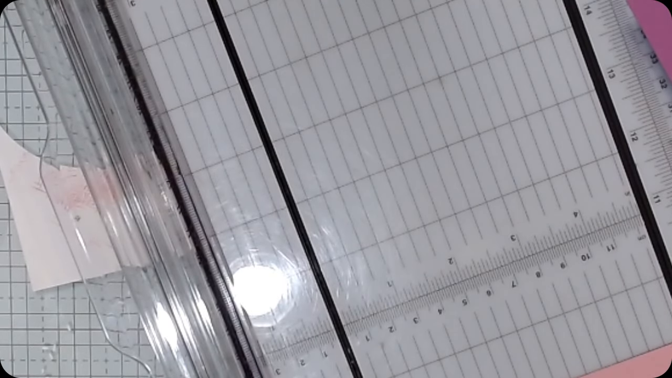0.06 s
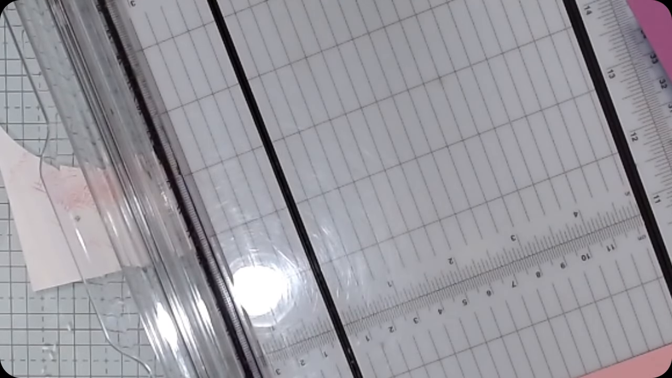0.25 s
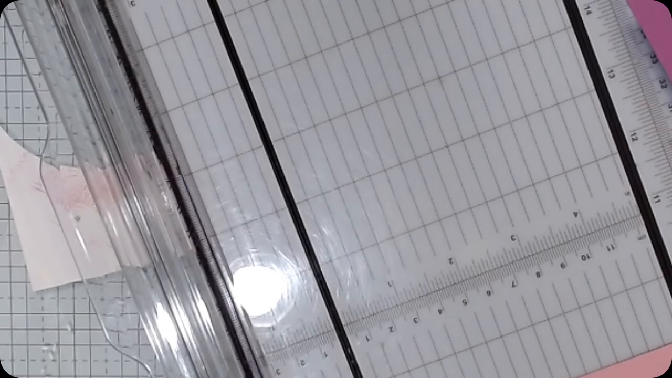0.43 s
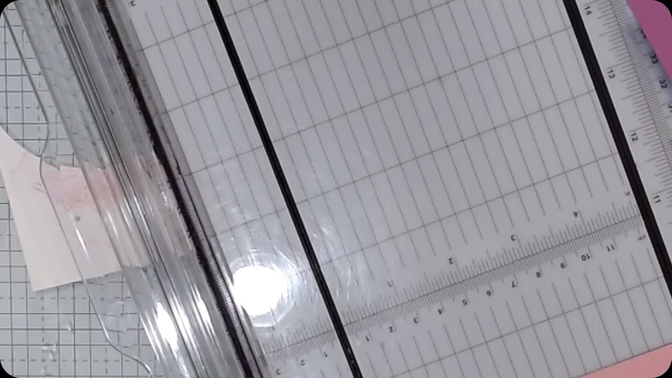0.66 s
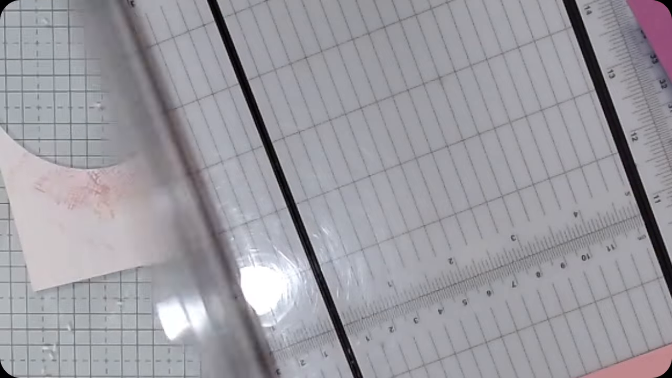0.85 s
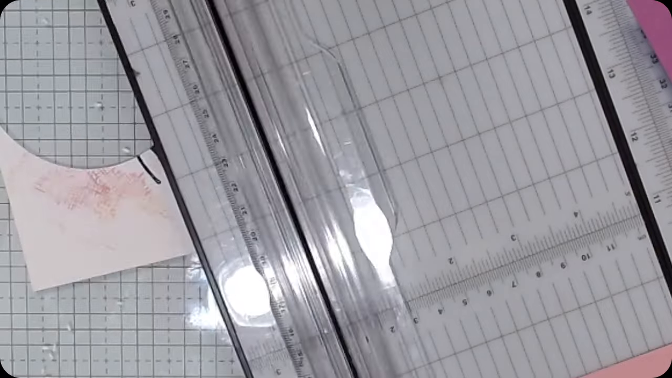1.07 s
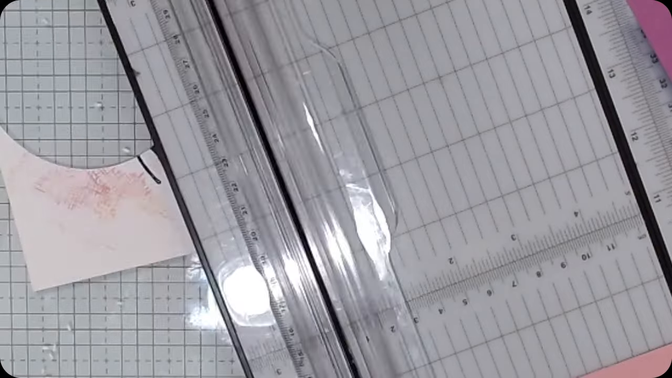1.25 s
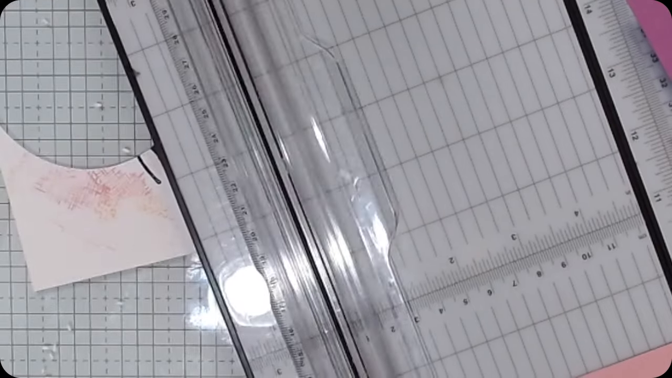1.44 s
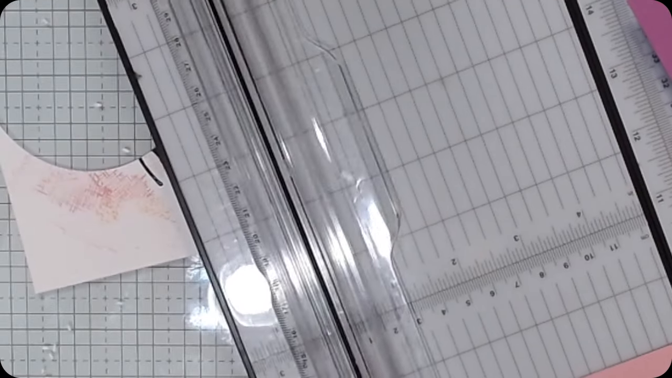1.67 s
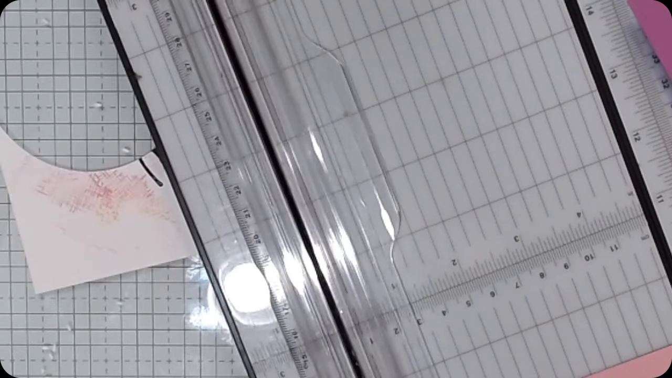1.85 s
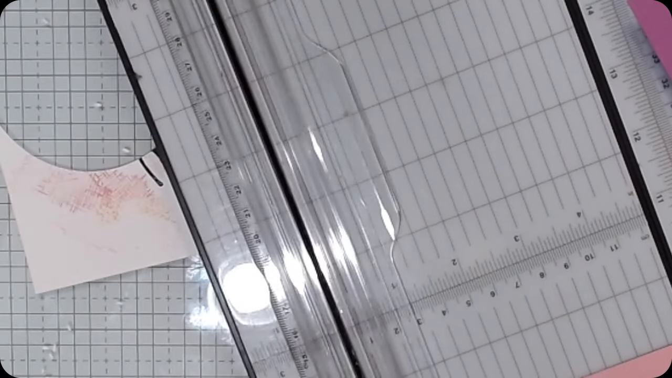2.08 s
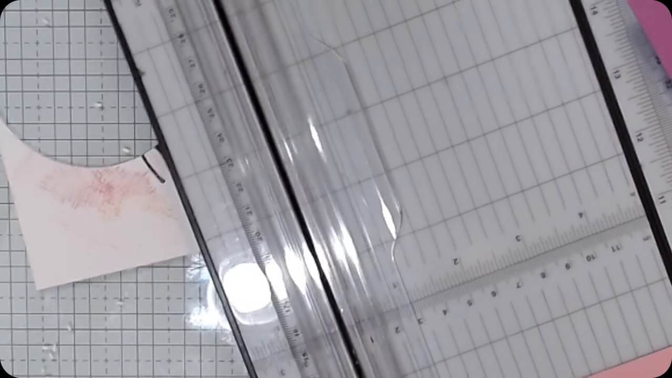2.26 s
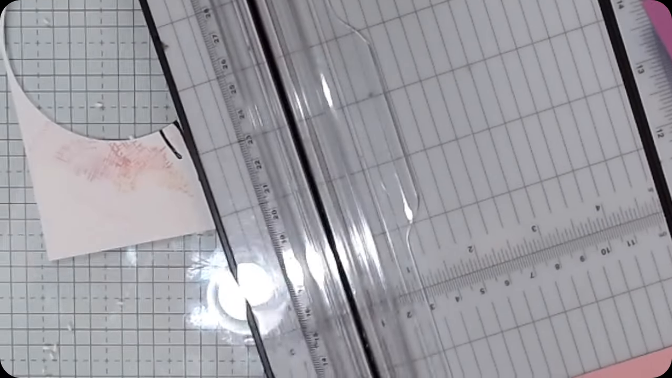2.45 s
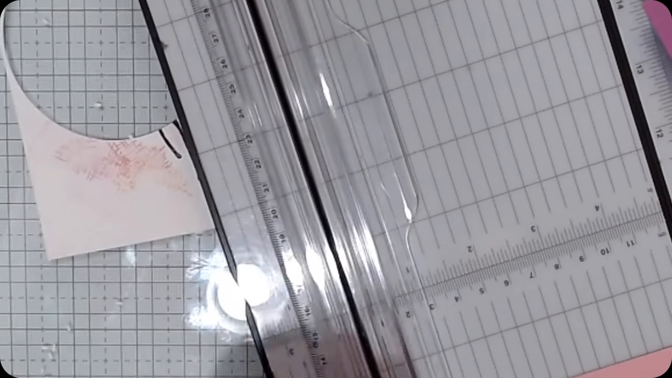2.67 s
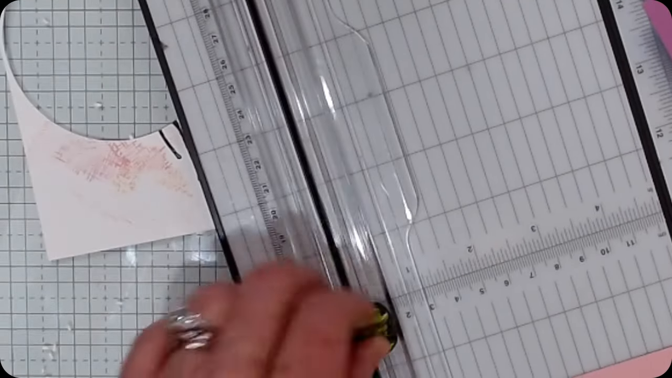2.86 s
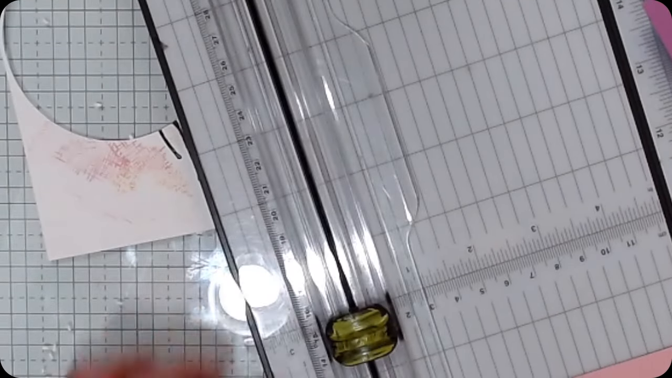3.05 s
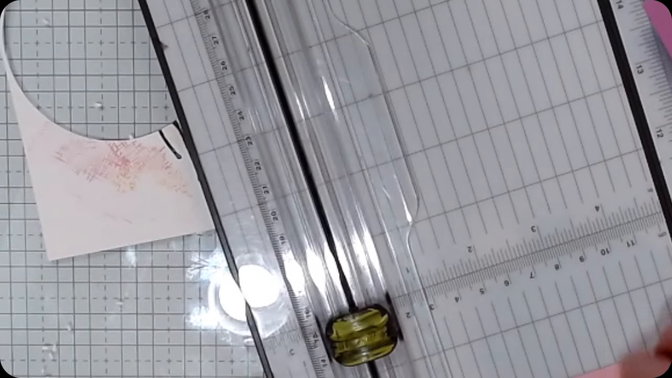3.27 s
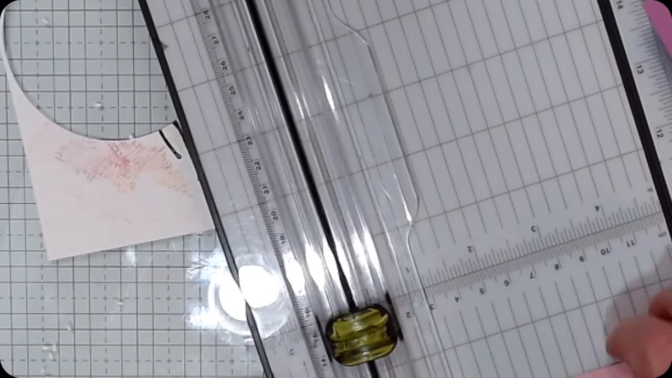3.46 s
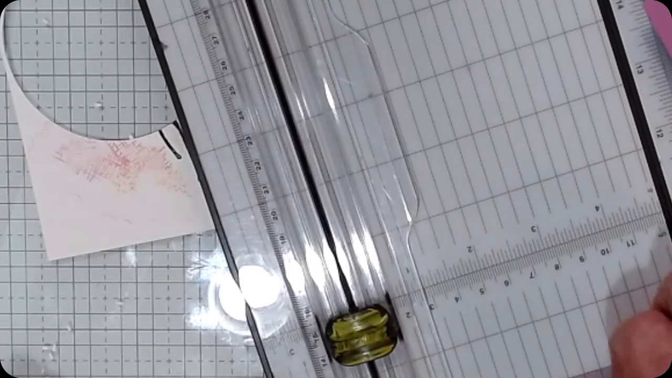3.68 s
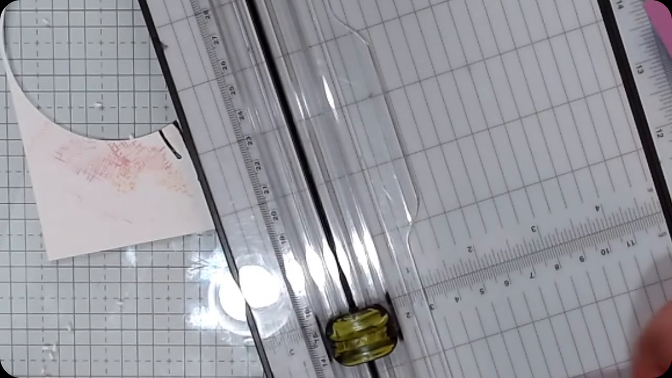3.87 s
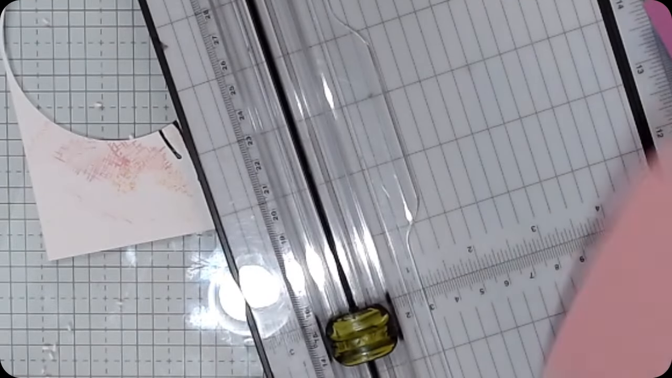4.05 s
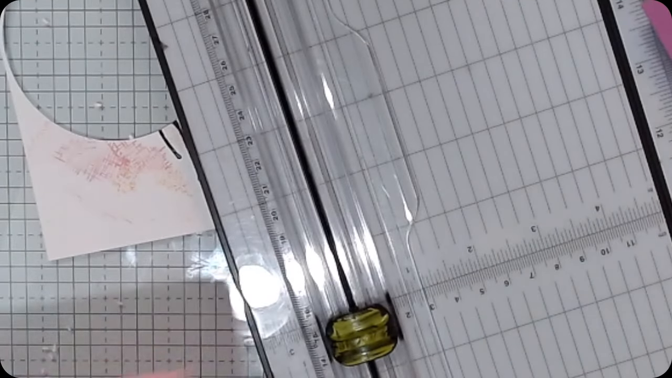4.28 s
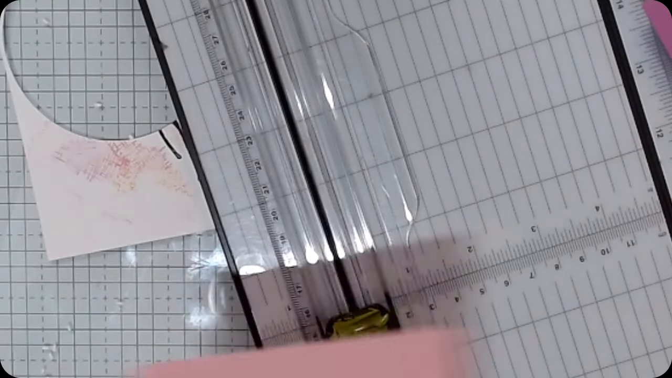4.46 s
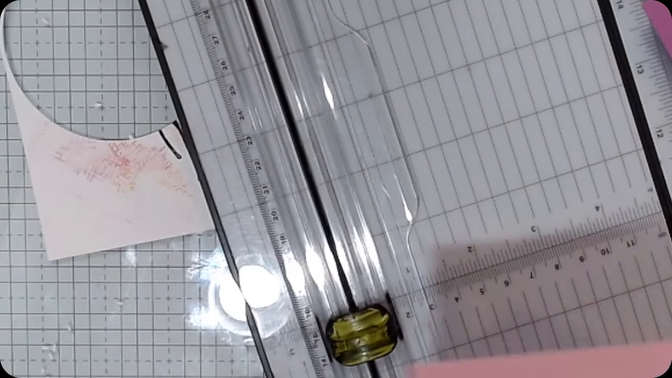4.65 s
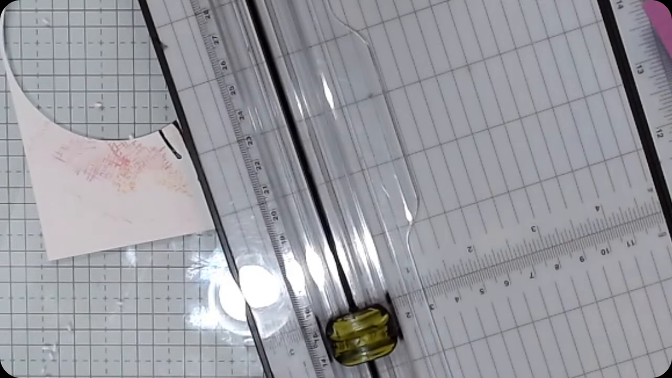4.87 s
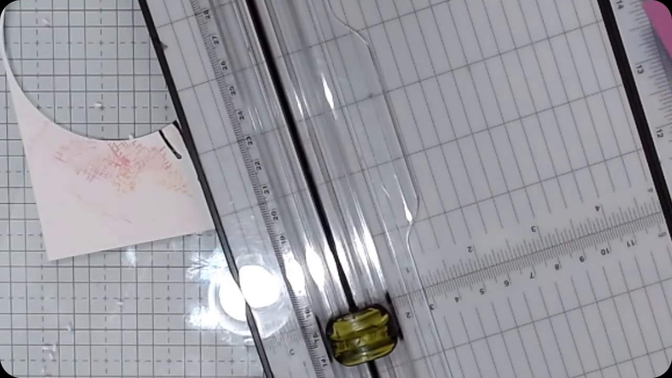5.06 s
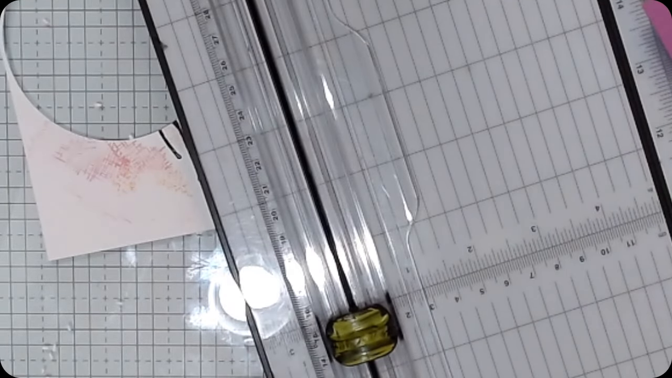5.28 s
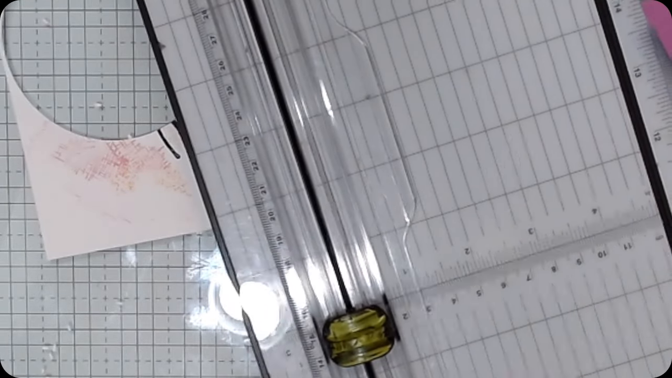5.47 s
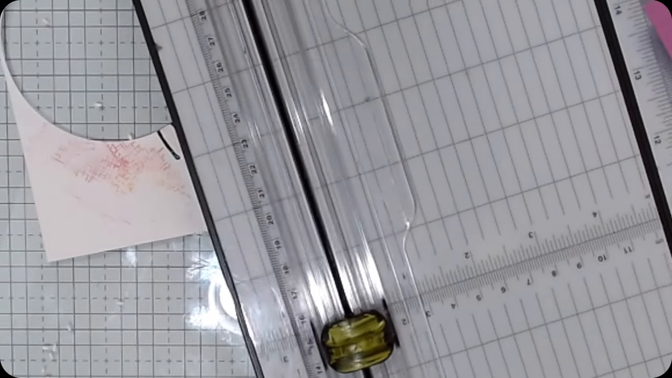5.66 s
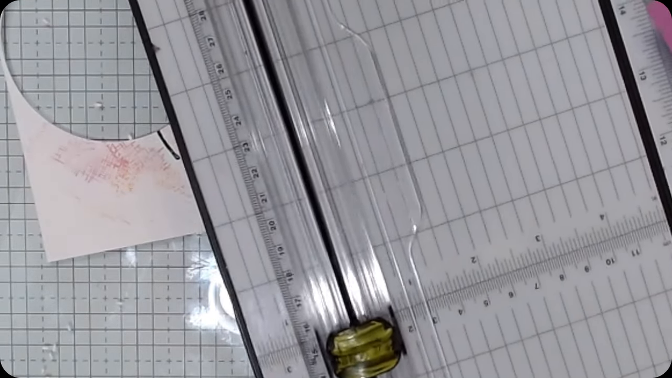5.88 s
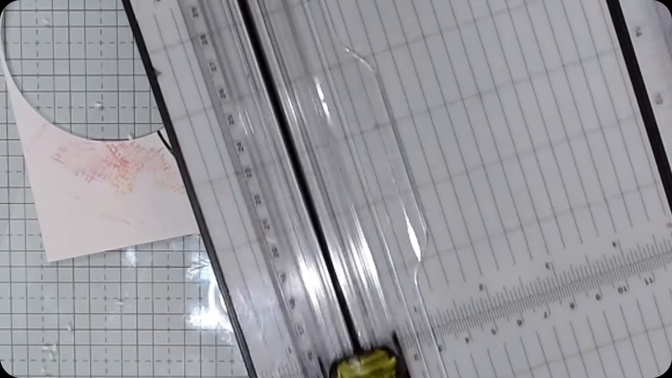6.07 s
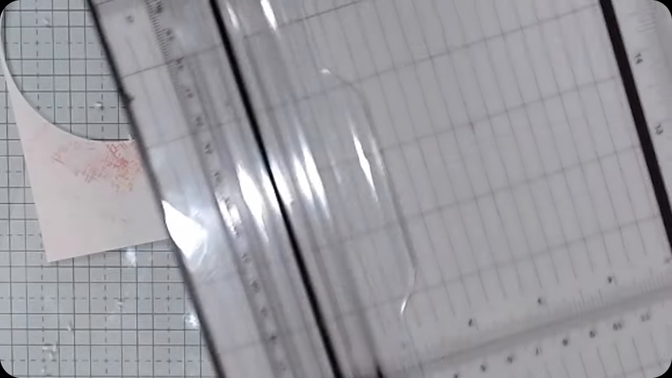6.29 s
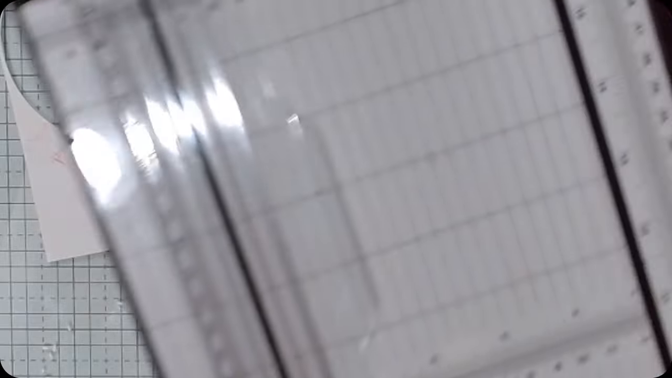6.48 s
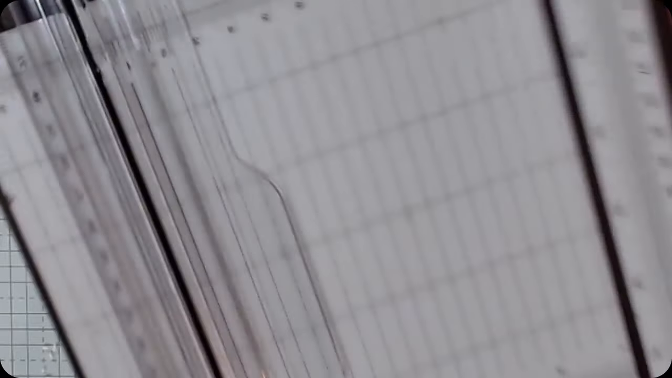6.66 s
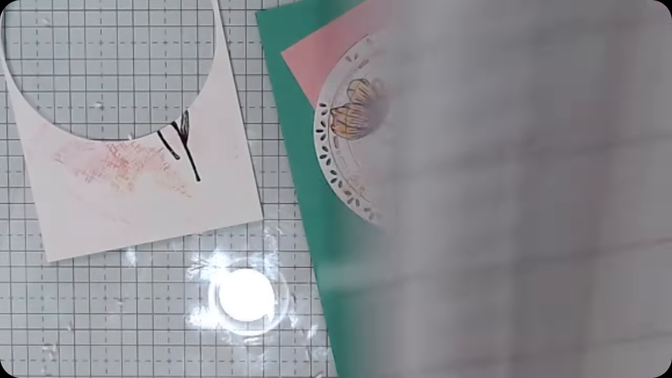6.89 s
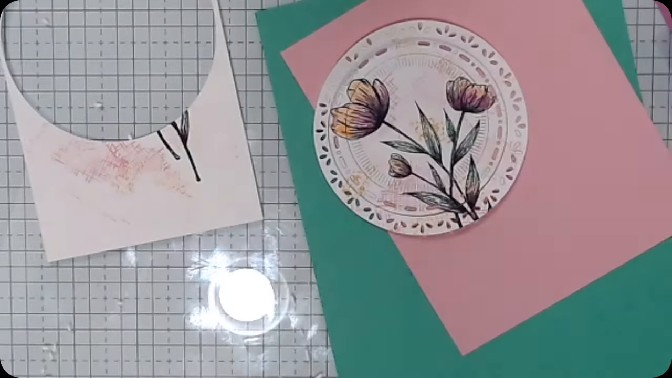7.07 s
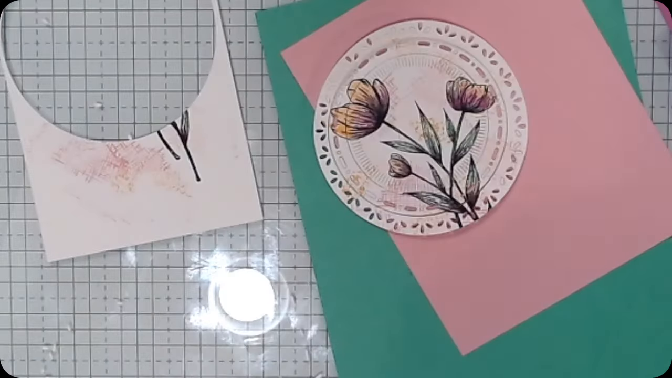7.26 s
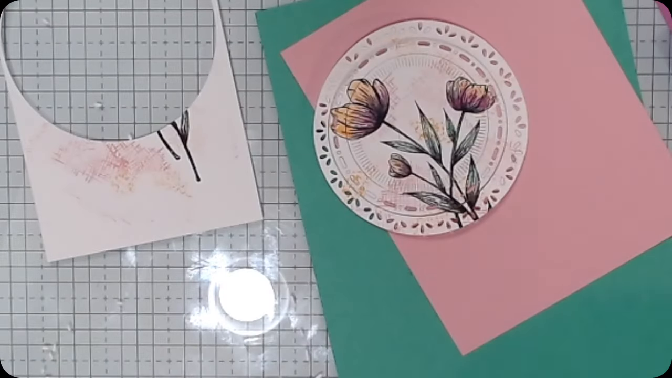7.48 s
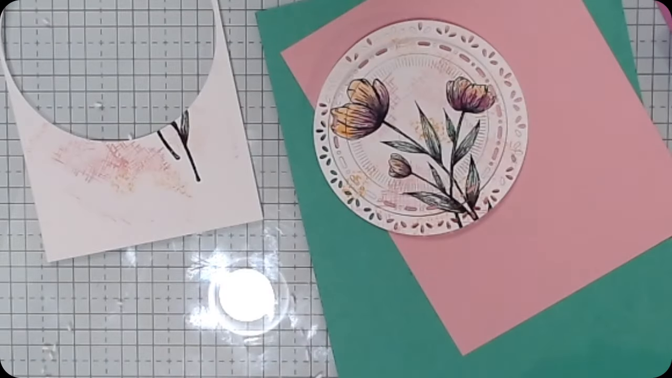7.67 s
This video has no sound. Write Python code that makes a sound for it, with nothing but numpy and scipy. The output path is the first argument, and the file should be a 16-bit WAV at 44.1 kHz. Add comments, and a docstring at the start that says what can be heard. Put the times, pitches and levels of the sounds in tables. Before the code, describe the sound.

A small quiet room with low soft noise and faint mains hum, heard close in slightly dull stereo. Almost nothing until a small plastic knock at 0.8 s. At 1.13 s the trimmer's arm claps over, hollow and bright, with a short rattle. From 1.7 s a tight cluster of clicks builds to the loudest, sharpest snap at 1.81 s, ringing and buzzing briefly. Light knocks at 2.0-2.3 s lead into a dry, gritty blade rasp, 2.33-2.77 s, its resonances climbing, halted by a firm clack; ticks follow at 2.9-3.0 s. From 3.3 to 4.0 s card flicks, taps and short papery glides mix with dull table thuds, then thin out. Small ticks come at 5.3-5.8 s, a scuff at 5.92, a short scrape at 6.45 with very faint wavering squeaks, and a soft card landing at 6.83. Quiet rustle fades to room tone.

```python
"""Plastic paper trimmer on a craft table, close to two microphones in a small room.
Arm, latch and carriage knock as decaying noise bursts through tray modes, and longer modes ring on.
The blade rasps through cardstock to its stop: random slips drive rail resonances that climb.
The card taps, glides and lands, the base scuffs and scrapes free, the loose arm rattles, thin squeaks bend.
Table thuds and rumble lie below; echoes, room noise and mains hum surround it all."""
import sys
import numpy as np
from scipy import signal
from scipy.fft import rfft, irfft
from scipy.io import wavfile

SR = 44100
rng = np.random.default_rng(int(sys.argv[2]) if len(sys.argv) > 2 else 0)


def transcribe(u):
    """Save the signal u as a 16-bit wav file named by the first command-line argument.

    u: samples, shape (n,) or (channels, n), limited to [-1, 1]; the rate is SR.
    q: integer samples, one column per channel.
    """
    v = np.clip(np.atleast_2d(u).T, -1, 1)
    q = np.round(v * 32767).astype(np.int16)
    wavfile.write(sys.argv[1], SR, q)


N = 340893
TIME = np.arange(N) / SR


def undb(db):
    """Decibels to gain."""
    return 10 ** (np.asarray(db) / 20)


def unit(x):
    """Scale to rms 1."""
    return x / np.sqrt(np.mean(x ** 2))


def band(x, lo_hz, hi_hz, order=3):
    """Butterworth band-pass."""
    return signal.sosfilt(signal.butter(order, [lo_hz, hi_hz], "band", fs=SR, output="sos"), x + 1e-18)


def colour(x, points, power=1, size=4096):
    """Minimum-phase filter through (frequency [Hz], gain [dB]) points; power scales the dB."""
    hz, db = np.transpose(points)
    bins_hz = np.maximum(np.arange(size // 2 + 1), .5) * SR / size
    gain_db = np.interp(np.log(bins_hz), np.log(hz), db)
    cepstrum = irfft(power * np.log(undb(gain_db)))
    # fold the cepstrum to make the filter causal
    cepstrum[1:size // 2] *= 2
    cepstrum[size // 2 + 1:] = 0
    response = irfft(np.exp(rfft(cepstrum)))
    return signal.fftconvolve(x, response)[:len(x)]


def resonate(x, peaks):
    """Parallel resonances (frequency [Hz], width [Hz], gain [dB])."""
    out = 0
    for hz, width_hz, db in peaks:
        b, a = signal.iirpeak(hz, hz / width_hz, fs=SR)
        out = out + undb(db) * signal.lfilter(b, a, x + 1e-18)
    return out


def fade(t, t60_s):
    """Exponential decay, 60 dB in t60_s."""
    return np.exp(-np.log(1000) * t / t60_s)


def ramp(start_s, length_s):
    """Rise from 0 to 1; with a negative length, a fall that ends at start_s."""
    return np.clip((TIME - start_s) / length_s, 0, 1)


def stroke(start_s, length_s):
    """Loudness of one hand stroke: speeds up and slows down as a half sine."""
    return np.sin(np.pi * ramp(start_s, length_s))


def strokes(rows):
    """Body and hiss gains of strokes (start [s], length [s], body level [dB], hiss level [dB])."""
    return sum(np.outer(undb([body_db, hiss_db]), stroke(start_s, length_s))
               for start_s, length_s, body_db, hiss_db in rows)


def grains(rate_hz, spread_db):
    """Tiny slips and snapping fibres: random clicks of uneven size and either sign."""
    size = undb(spread_db * np.minimum(rng.exponential(size=N), 4))
    fires = rng.random(N) < rate_hz / SR
    return unit(fires * size * rng.choice([-1, 1], N))


# treble of a blow: (frequency [Hz], gain [dB])
SNAP_COLOUR = [(2450, -0.5), (3700, 1), (5100, -1.5), (6600, -7.5), (7400, -15)]
# hard contacts snap and are over, dull ones chatter on: t60 at snap = body, its growth as snap falls
CHATTER_T60_S, CHATTER_S_PER_DB, SHORTEST_T60_S = .04, .0025, .026


def blows(table, peaks, plain_db, tick_db, spot_db, thump_hz, body_hz):
    """Each blow is a sharp tick and a short noise chatter, split into thump, body and snap."""
    out = np.zeros(N + SR)
    t = np.arange(SR // 5) / SR
    for time_s, level_db, thump_db, snap_db, spot_hz in table:
        t60_s = max(CHATTER_T60_S - CHATTER_S_PER_DB * snap_db, SHORTEST_T60_S)
        shock = rng.standard_normal(len(t)) * fade(t, t60_s)
        shock[0] += undb(tick_db)
        shock = undb(plain_db) * shock + resonate(shock, peaks)
        shock = shock + resonate(shock, [(spot_hz, spot_hz / 6, spot_db)])
        thump = unit(band(shock, thump_hz, 400, order=2))
        body = unit(band(shock, body_hz, 2140))
        snap = unit(colour(band(shock, 2350, 12000), SNAP_COLOUR))
        hit = undb(thump_db) * thump + body + undb(snap_db) * snap
        start = int(time_s * SR)
        # body level = its energy packed into 10 ms; unit() spread it over 200 ms
        out[start:start + len(t)] += undb(level_db) * hit / np.sqrt(20)
    return out[:N]


# blows on the trimmer, level before the trim in trimmer():
# (time [s], level [dB], thump re level [dB], snap re level [dB], struck-spot resonance [Hz])
KNOCKS = [(0.791, -40.5, -17, -8, 1580), (1.03, -46, -12, -20, 1520), (1.101, -41, 0, -10.5, 600),
          (1.1324, -22, -10, -15, 850), (1.139, -23, -9.5, -3, 3420), (1.151, -37, -8, -6, 800),
          (1.244, -48, -10, -22, 1000), (1.3725, -42.5, -3, -10.5, 910), (1.389, -43, -16.5, -18, 810),
          (1.7055, -50, -13, 0, 1900), (1.709, -36, -13, -16, 1350), (1.737, -45, -12, -12.5, 710),
          (1.7772, -23, -13, -8.5, 1420), (1.792, -23.5, -13, -12, 1720), (1.808, -28, -21, 3, 2610),
          (1.8112, -16, -17.5, 1, 5000), (1.8206, -23.5, -12.5, -16, 1530), (1.863, -35.5, -22, -5, 630),
          (2.0146, -40.5, -5, -10.5, 800), (2.035, -44, -29, -15, 920), (2.222, -39.5, -6, -11.5, 740),
          (2.27, -34, -15.5, -3, 860), (2.284, -43, 2.5, -9, 900), (2.7604, -27, -8.5, -2.5, 5230),
          (2.766, -28.5, -16, -11, 1640), (2.9219, -36, -31, 1, 4270), (3.001, -48, 6, 0, 1500),
          (3.0055, -37, -10, -9.5, 1540), (3.0105, -36.5, -19, -8, 1500), (3.17, -47.5, -3, -11.5, 775),
          (5.307, -48, -7.5, -10.5, 1385), (5.434, -45.5, -9, 1.5, 2800), (5.514, -50.5, -11.5, -7, 2850),
          (5.546, -51, -13, -17, 800), (5.636, -53.5, -17.5, -.5, 1980), (5.7456, -36, -13.5, -10, 800),
          (5.789, -52.5, -14.5, -16, 836), (5.951, -48, -20, -8, 1230), (6.451, -43.5, -12.5, -10, 780),
          (6.47, -43.5, -10, -6.5, 2070), (7.585, -58, -10.5, -22, 950)]
# broad resonances of tray and arm: (frequency [Hz], width [Hz], gain [dB])
TRAY_MODES = [(175, 70, 0.5), (400, 110, -1), (587.5, 100, 5), (780, 120, 5), (995, 110, -4),
              (1306, 200, -5), (1954, 630, -6.5), (2460, 260, -5), (2850, 450, -5.5), (3410, 140, 4.5),
              (3990, 130, -4.5), (5490, 200, -8.5)]
# long rings of the plastic, gain before the trim in trimmer(): (frequency [Hz], gain [dB], t60 [s])
PLASTIC_RINGS = [(182, -9, 0.38), (604, -6.5, 0.093), (697, 3.5, 0.074), (867, 1, 0.62),
                 (1034, -15.5, 0.48), (1283, 3, 0.33), (1400, -3.5, 0.59), (1782, -17.5, 1.3),
                 (2186, -17, 0.35), (2430, -17, 0.37), (2810, 3, 0.19), (3260, -21.5, 0.35),
                 (3499, -22.5, 0.29), (3747, -23.5, 0.43), (4100, -9.5, 0.22), (4210, -17.5, 0.23),
                 (4328, -19, 0.72), (4630, -9, 0.35), (4743, -20, 0.28), (4840, -22, 0.3)]


def trimmer():
    """Arm, latch and carriage knock on the tray; each blow couples differently to the ringing modes."""
    hits = blows(KNOCKS, TRAY_MODES, plain_db=0.5, tick_db=18.5, spot_db=1.5, thump_hz=95, body_hz=480)
    times_s = np.array(KNOCKS)[:, 0]
    couplings = rng.uniform(-1, 1, (len(PLASTIC_RINGS), len(KNOCKS)))
    # index of the latest blow at every sample
    latest = np.maximum(np.searchsorted(times_s - 1 / SR, TIME) - 1, 0)
    ring = np.zeros(N)
    for coupling, (hz, db, t60_s) in zip(couplings, PLASTIC_RINGS):
        width_hz = np.log(1000) / np.pi / t60_s
        ring += resonate(hits * coupling[latest], [(hz, width_hz, db)])
    return undb(-1.6) * hits + undb(0.3) * ring


# treble of rubbing: (frequency [Hz], gain [dB])
RUB_COLOUR = [(2450, 1.5), (3600, 3), (5100, 3), (6600, 0.5), (7400, -8.5)]


def rub(gains, slips, peaks, plain_db, rumble_db):
    """Friction: a stream of slips shakes the body and hisses above it."""
    body_gain, hiss_gain = gains
    shaken = undb(plain_db) * slips + resonate(slips, peaks)
    low = unit(band(shaken, 90, 400, order=2))
    body = unit(band(shaken, 350, 2254)) + undb(rumble_db) * low
    hiss = unit(colour(band(shaken, 2350, 13000), RUB_COLOUR))
    return body * body_gain + hiss * hiss_gain


# resonances of carriage and rail: (frequency [Hz], width [Hz], gain [dB])
RAIL_MODES = [(160, 32, -0.5), (598, 120, 2.5), (928, 98, -7.5), (1443, 96, -5), (2033, 30, -4),
              (2985, 90, 5.5), (3377, 260, 5), (4180, 91, 1), (5660, 200, -17)]
# rail between carriage and stop, at FASTEST_S: (frequency [Hz], width [Hz], gain [dB])
SPAN_MODES = [(1100, 91, 6.5), (1460, 100, 3.5), (3090, 160, 4.5), (4090, 170, 5.5), (5300, 220, 7)]
# carriage creeps up to the card, bites, cuts at an even push, is halted by its stop
CREEP_S, BITE_S, STOP_S = 2.25, 2.335, 2.77
BITE_ATTACK_S, STOP_RELEASE_S = .04, .015
CREEP_DB, CUT_BODY_DB, CUT_HISS_DB = -53, -37.4, -35
# hiss peaks where the carriage is fastest; sag is reached half a cut's length away
FASTEST_S, HISS_SAG_DB = 2.58, 3.5
CLIMB_PER_S = .75  # climb of the span modes, share of their frequency per second


def blade():
    """The blade tears fibres at about 1800 slips a second and shakes carriage and rail."""
    flutter_db = 1.6 * unit(band(rng.standard_normal(N), 30, 250, order=1))
    slips = grains(rate_hz=1800, spread_db=2.0) * undb(flutter_db)
    # free rail shortens ahead of the carriage: read its resonances ever faster
    from_fastest_s = np.clip(TIME, BITE_S, STOP_S) - FASTEST_S
    clock_s = np.cumsum(1 + CLIMB_PER_S * from_fastest_s) / SR
    slips = slips + np.interp(clock_s, TIME, resonate(slips, SPAN_MODES))
    cutting = ramp(BITE_S, BITE_ATTACK_S) * ramp(STOP_S, -STOP_RELEASE_S)
    creeping = stroke(CREEP_S, BITE_S + BITE_ATTACK_S - CREEP_S)
    sag_db = HISS_SAG_DB * (2 * from_fastest_s / (STOP_S - BITE_S)) ** 2
    body_gain = undb(CUT_BODY_DB) * cutting + undb(CREEP_DB) * creeping
    hiss_gain = undb(CUT_HISS_DB - sag_db) * cutting
    return rub((body_gain, hiss_gain), slips, RAIL_MODES, plain_db=-0.5, rumble_db=-11.5)


# loose arm in its hinges after each slam: (start [s], body level [dB], hiss level [dB])
RATTLES = [(1.15, -41, -44), (1.83, -40, -40.5)]
RATTLE_T60_S = .22


def rattle():
    """The arm buzzes against the tray as sparse slips that die away."""
    gains = 0
    for start_s, body_db, hiss_db in RATTLES:
        decay = (TIME > start_s) * fade(np.abs(TIME - start_s), RATTLE_T60_S)
        gains = gains + np.outer(undb([body_db, hiss_db]), decay)
    return rub(gains, grains(rate_hz=600, spread_db=2.5), TRAY_MODES, plain_db=-2, rumble_db=-10)


# sleeves and card while the hands are at work
BUSY_START_S, BUSY_END_S, BUSY_FADE_S = .75, 7.5, .2
RUSTLE_BODY_DB, RUSTLE_HISS_DB, RUSTLE_SWELL_RMS_DB = -73, -78, 3


def rustle():
    """Body and hiss gains of small restless movements: a randomly swelling level."""
    busy = ramp(BUSY_START_S, BUSY_FADE_S) * ramp(BUSY_END_S, -BUSY_FADE_S)
    swell_db = RUSTLE_SWELL_RMS_DB * unit(band(rng.standard_normal(N), 2, 30, order=2))
    return np.outer(undb([RUSTLE_BODY_DB, RUSTLE_HISS_DB]), busy * undb(swell_db))


# flicks and taps of the card:
# (time [s], level [dB], thump re level [dB], snap re level [dB], struck-spot resonance [Hz])
TAPS = [(0.429, -66, 14.5, 10.5, 4530), (3.2935, -56, 11, -.5, 586), (3.3035, -38, 4, -9, 634),
        (3.3146, -42.5, 8, -2, 650), (3.3638, -34, -9, -4.5, 1540), (3.376, -40, -27, -2, 3510),
        (3.395, -43, -12, -11, 665), (3.463, -39.5, -6, -20, 576), (3.562, -44, -3.5, -6, 2200),
        (3.575, -42, 0, -8, 584), (3.75, -47.5, -15, -.5, 2700), (3.8784, -35.5, -25, 7.5, 3150),
        (3.885, -44, -10, -3, 2540), (3.895, -36, -14, -16, 1420), (3.9123, -37.5, -6, -5, 1390),
        (3.9723, -33, -12, -3.5, 1710), (4.218, -45, -9, -5, 1180), (4.382, -48, -8, -9.5, 1530),
        (4.704, -53, -4, -6.5, 1030), (4.7335, -47.5, -9, -4.5, 1320), (4.783, -53, -4, -14.5, 1420),
        (6.839, -46, -6.5, -4.5, 1624)]
# short soft glides: mostly card, also a slide before the latch and the scuff's trailing end:
# (start [s], length [s], body level [dB], hiss level [dB])
GLIDES = [(0.33, .125, -62, -62), (0.77, .1, -59, -71), (0.9, .22, -61, -72), (1.55, .06, -58, -69),
          (1.745, .05, -50, -56), (2.16, .13, -65, -62), (3.02, .27, -73, -72), (3.28, .11, -51, -56),
          (3.345, .165, -50, -47.5), (3.45, .28, -59, -66), (3.735, .165, -60, -49.5),
          (3.865, .125, -44.5, -52.5), (3.945, .035, -52, -45), (4.02, .14, -63, -58),
          (4.19, .13, -61, -64), (4.36, .07, -54, -65), (4.68, .29, -65, -67.5), (4.96, .18, -62, -61.5),
          (5.42, .28, -64, -71), (6.02, .07, -61, -66), (6.97, .08, -64, -67.5), (7.15, .15, -69, -71)]


def card():
    """Broad sheet modes are struck by flicks and rubbed by short soft glides and rustle."""
    # (frequency [Hz], width [Hz], gain [dB])
    sheet = [(200, 200, -10.5), (736, 260, 4.5), (1390, 450, -12.5), (2520, 260, 0), (3400, 800, -2.5)]
    flicks = blows(TAPS, sheet, plain_db=-4.5, tick_db=18, spot_db=5, thump_hz=105, body_hz=510)
    gains = strokes(GLIDES) + rustle()
    glides = rub(gains, grains(rate_hz=2500, spread_db=2.5), sheet, plain_db=6, rumble_db=-9.5)
    return flicks + glides


# one stroke each: (start [s], length [s], body level [dB], hiss level [dB])
# feet scuffing on the mat
SCUFF = (5.92, .105, -43, -47)
# base scraping free
LIFT = (6.447, .055, -45, -50)
# card landing with a short brush
LANDING = (6.82, .095, -54, -53.5)
# resonances of the dragged base: (frequency [Hz], width [Hz], gain [dB])
BASE_MODES = [(703, 19, 2.5), (1230, 180, -10.5), (1660, 71, -10), (2020, 36, -3), (2240, 45, -5),
              (2790, 96, 3), (2930, 16, -7), (3470, 48, -3), (3910, 32, -16), (4970, 75, -14.5),
              (5980, 44, -11.5)]


def moving():
    """Slips excite the base on the mat, the tray as it scrapes free, and the card as it lands."""
    scuff_slips = grains(rate_hz=1500, spread_db=1.5)
    scuff = rub(strokes([SCUFF]), scuff_slips, BASE_MODES, plain_db=-16, rumble_db=-16)
    lift_slips = grains(rate_hz=1300, spread_db=3.0)
    lift = rub(strokes([LIFT]), lift_slips, TRAY_MODES, plain_db=-3.5, rumble_db=-29)
    # (frequency [Hz], width [Hz], gain [dB])
    landing_modes = [(1648, 110, 11.5), (2880, 270, -23), (3950, 310, -5)]
    landing_slips = grains(rate_hz=2000, spread_db=2.5)
    landing = rub(strokes([LANDING]), landing_slips, landing_modes, plain_db=-1.5, rumble_db=-10)
    return scuff + lift + landing


# faint thin squeaks: (start [s], length [s], pitch [Hz], bend [Hz], peak level [dB])
SQUEAKS = [(5.97, .17, 2900, 25, -67.5), (6.39, .08, 2740, 50, -71), (6.56, .18, 5720, 680, -74),
           (6.71, .44, 5850, -430, -76.5)]
SQUEAK_WAVER_RMS = .012  # share of the pitch


def squeak(start_s, length_s, hz, bend_hz, peak_db):
    """A thin, unsteady whistle: a sine whose pitch bends up or down and back as it swells."""
    swell = stroke(start_s, length_s)
    waver = SQUEAK_WAVER_RMS * unit(band(rng.standard_normal(N), 28, 400, order=1))
    pitch_hz = (hz + bend_hz * swell) * (1 + waver)
    return undb(peak_db) * np.sqrt(swell) * np.sin(2 * np.pi * np.cumsum(pitch_hz) / SR)


# dull pushes on the table: (time [s], pitch [Hz], level before decay [dB], t60 [s])
THUDS = [(1.134, 150, -40, .13), (1.777, 85, -39, 0.15), (1.813, 33.2, -40, 0.41), (2.274, 154, -43, 0.32),
         (3.299, 72, -37, .17), (3.304, 250, -38, 0.17), (3.313, 180, -36, 0.092), (3.562, 166, -45, 0.055)]


def thuds():
    """The table top gives under a push and swings back: decaying sines."""
    out = np.zeros(N)
    for time_s, hz, db, t60_s in THUDS:
        t = np.maximum(TIME - time_s, 0)
        out += undb(db) * np.sin(2 * np.pi * hz * t) * fade(np.minimum(t, 1), t60_s)
    return out


LEAN_RUMBLE_DB, LEAN_END_S, LEAN_RELEASE_S = -64.5, 4.2, .7


def rumble():
    """The table shudders while leaned on: low noise that fades out."""
    shudder = unit(band(rng.standard_normal(N), 25, 120, order=2))
    return undb(LEAN_RUMBLE_DB) * shudder * ramp(LEAN_END_S, -LEAN_RELEASE_S)


def echoes(x, t60_s, delay_s, build_s):
    """A diffuse cloud of reflections: decaying noise response of unit energy."""
    t = np.arange(SR // 2) / SR
    onset = np.clip((t - delay_s) / build_s, 0, 1)
    response = rng.standard_normal(len(t)) * fade(t, t60_s) * onset
    return signal.fftconvolve(x, response / np.linalg.norm(response))[:N]


# colour of the room's tail: (frequency [Hz], gain [dB])
WALLS = [(85, -11.5), (210, 4), (720, -3.5), (1550, -5.5), (4100, -8), (7400, -6.5)]
# microphone difference from table reflections, before table_db: (frequency [Hz], side re mid [dB])
WIDTH = [(112, -22), (700, -26.5), (1130, -15), (1800, -7), (3000, -10.5), (5000, -3), (7300, -9.5)]
# balance of the microphones: (frequency [Hz], left minus right [dB])
LEFT_RIGHT = [(110, -0.3), (760, -1), (1220, -1.5), (2050, -3.5), (3250, -5), (6100, -0.3)]


def room(x, wet_db, t60_s, table_db):
    """Table reflections differ between the microphones; walls add a tail, alike only in the bass."""
    mid, side = (undb(wet_db) * colour(echoes(x, t60_s, delay_s=0.0045, build_s=0.0056), WALLS)
                 for _ in range(2))
    side = colour(side, [(160, -22), (620, -22), (1150, -1), (1850, 1)])
    near = echoes(x, t60_s=.016, delay_s=0, build_s=.0002)
    side = side + undb(table_db) * colour(near, WIDTH)
    # trimmer lies to the right: left microphone hears it a sample later
    left = np.roll(x + mid + side, 1)
    right = x + mid - side
    return np.array([colour(left, LEFT_RIGHT, power=1 / 2), colour(right, LEFT_RIGHT, power=-1 / 2)])


# spectrum of the room noise, rescaled to rms 1: (frequency [Hz], density [dB per Hz])
ROOM_NOISE = [(13, -35.5), (22, -4), (64, -3), (154, -16.5), (251, -18.5), (298, -18.5), (508, -15.5),
              (574, -20.5), (848, -22), (1010, -26), (1380, -28), (2660, -35.5), (5940, -39.5), (7400, -47),
              (9620, -79), (16300, -120)]
ROOM_MID_DB = -59.6  # before the swell
# mains hum: (frequency [Hz], rms level [dB])
HUM = [(59.8, -66), (119.8, -71), (180, -76.5)]


def background():
    """Soft room noise with a restlessly swelling level, and mains hum as steady sines."""
    mid, side = (unit(colour(rng.standard_normal(N), ROOM_NOISE, size=16384)) for _ in range(2))
    side = colour(side, [(42, -8), (105, -2), (210, -1), (620, -8.5), (1550, 1.5), (6100, 2.5)])
    swell = undb(1.5 * unit(band(rng.standard_normal(N), 0.38, 7.3, order=1)))
    noise = undb(ROOM_MID_DB) * swell * np.array([mid + side, mid - side])
    hum = np.zeros(N)
    for hz, db in HUM:
        phase = rng.uniform(0, 2 * np.pi)
        hum += np.sqrt(2) * undb(db) * np.sin(2 * np.pi * hz * TIME + phase)
    return noise + hum


def scene():
    """All the handling in the room, over its noise."""
    tool = trimmer() + blade() + rattle() + moving()
    squeaks = sum(squeak(*row) for row in SQUEAKS)
    handling = tool + card() + squeaks + thuds() + rumble()
    return room(handling, wet_db=-7.5, t60_s=0.31, table_db=3.5) + background()


def record(dry):
    """The webcam rounds the loudest peaks and passes only what lies below 7450 Hz."""
    ceiling = .62
    rounded = ceiling * np.tanh(dry / ceiling)
    lowpass = signal.cheby1(16, .2, 7450, fs=SR, output="sos")
    return signal.sosfilt(lowpass, rounded)


dry = scene()
out = record(dry)
transcribe(out)
```